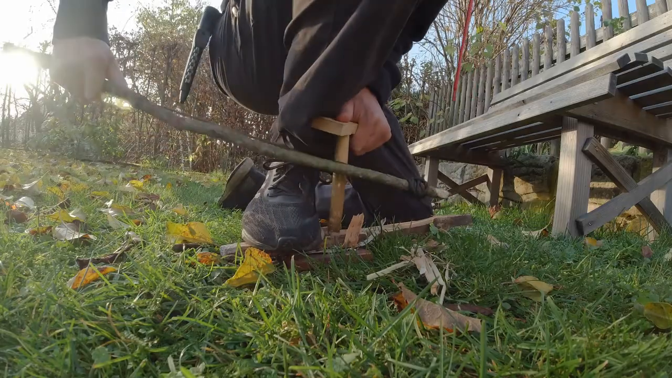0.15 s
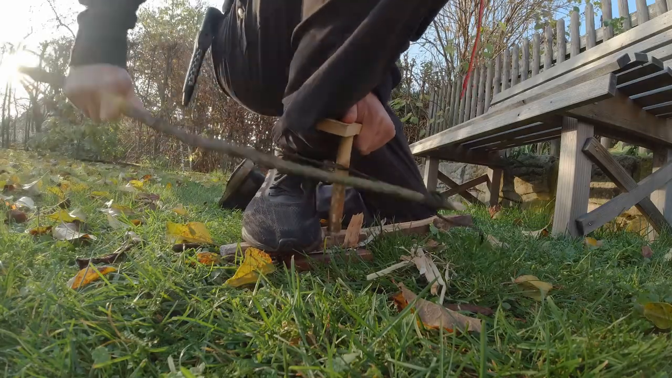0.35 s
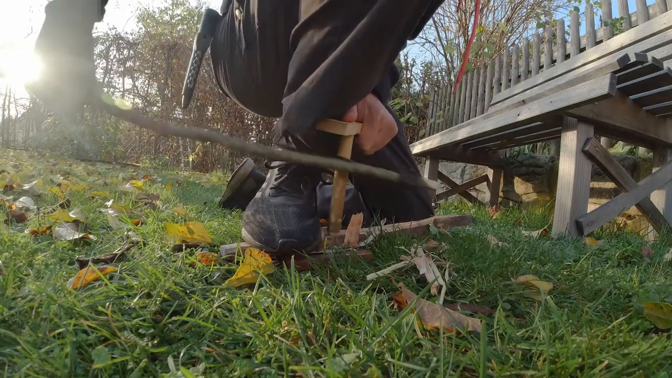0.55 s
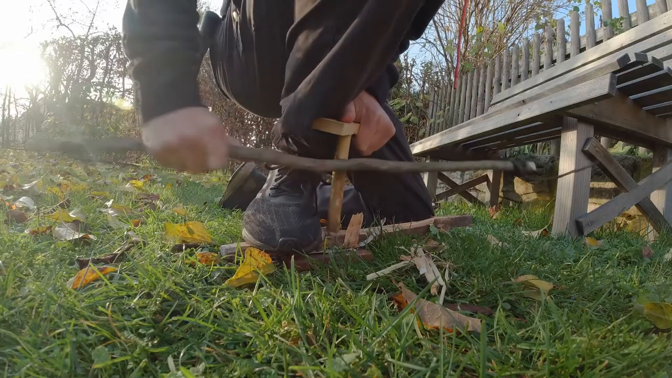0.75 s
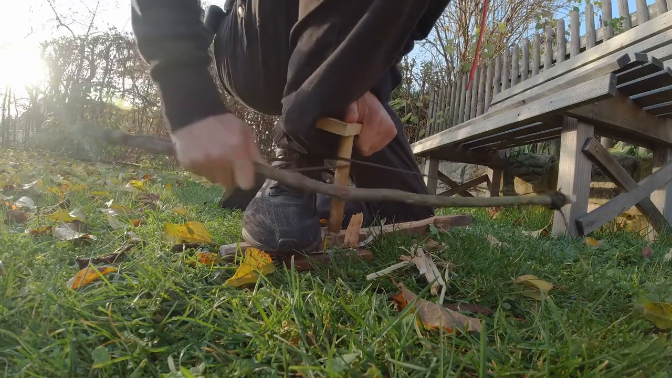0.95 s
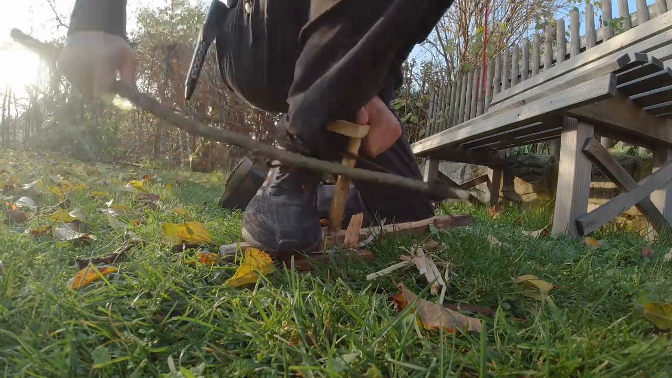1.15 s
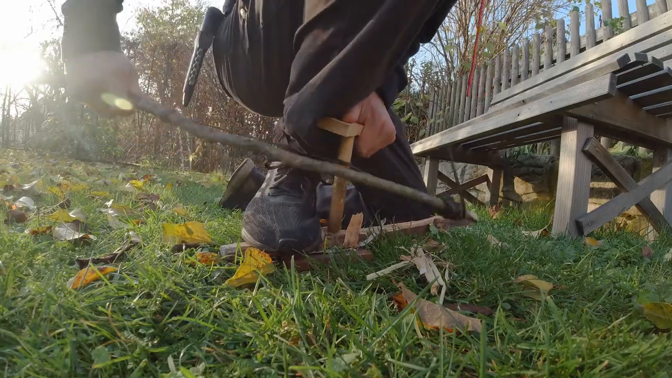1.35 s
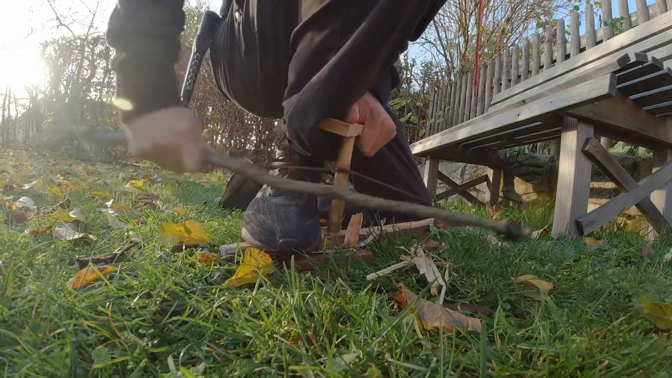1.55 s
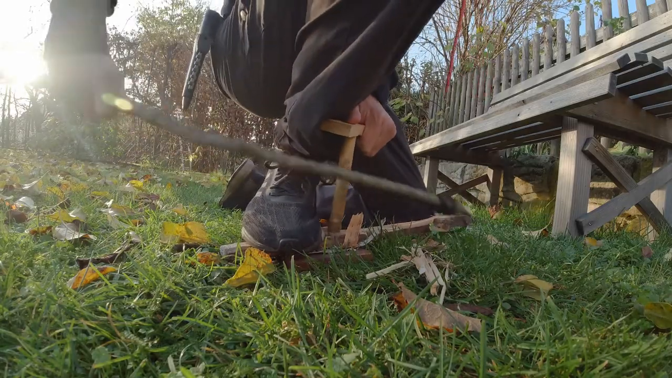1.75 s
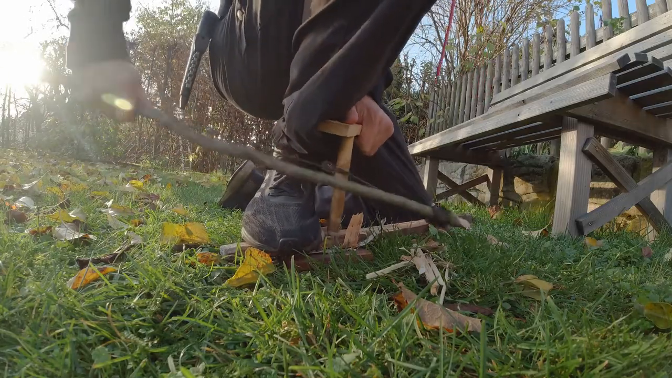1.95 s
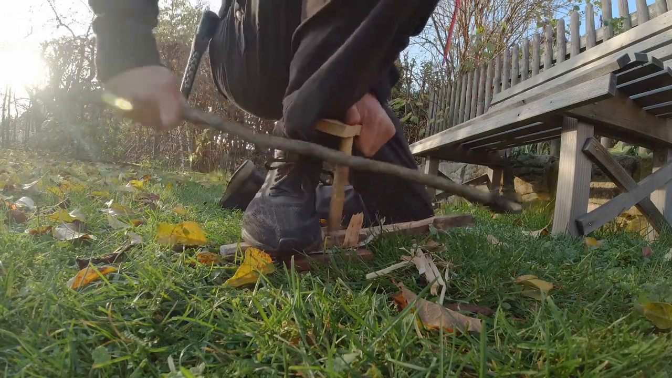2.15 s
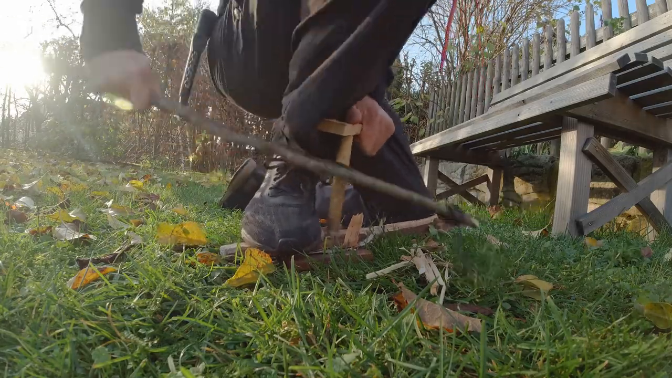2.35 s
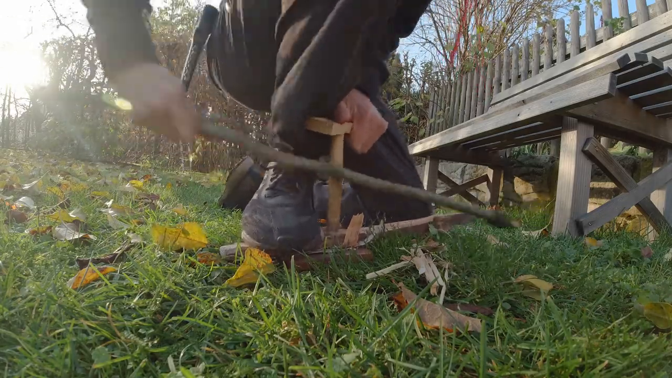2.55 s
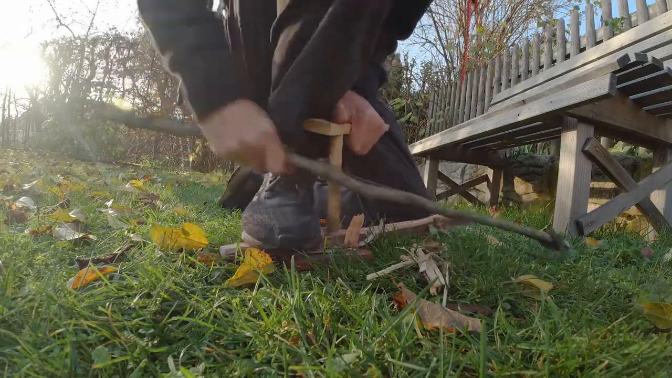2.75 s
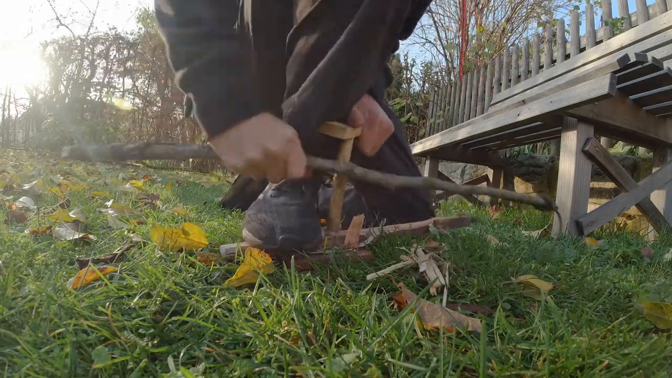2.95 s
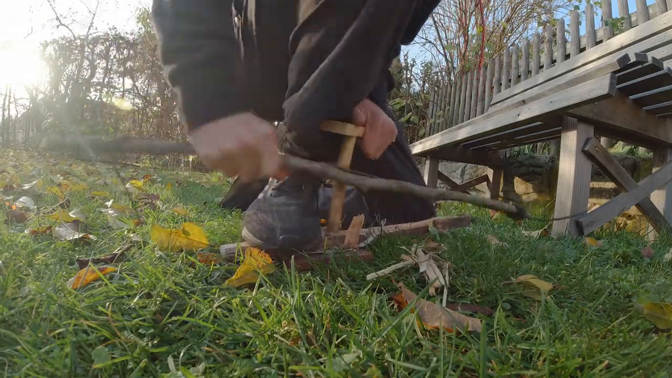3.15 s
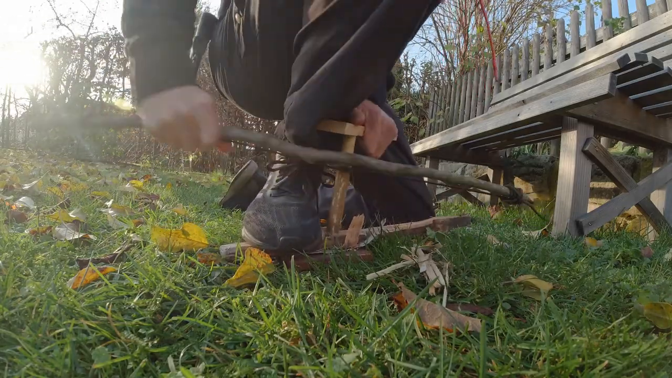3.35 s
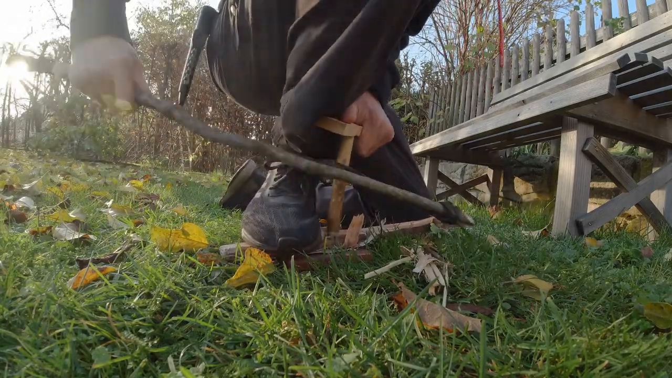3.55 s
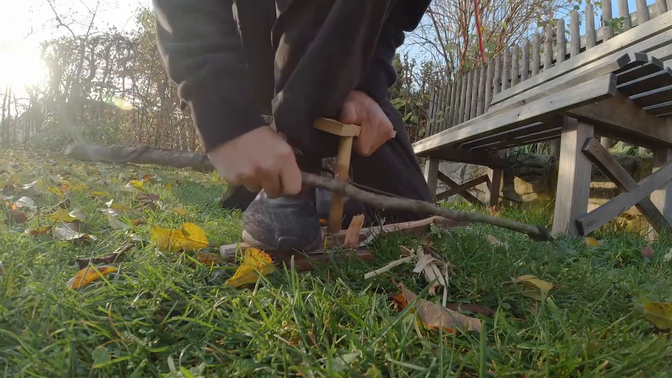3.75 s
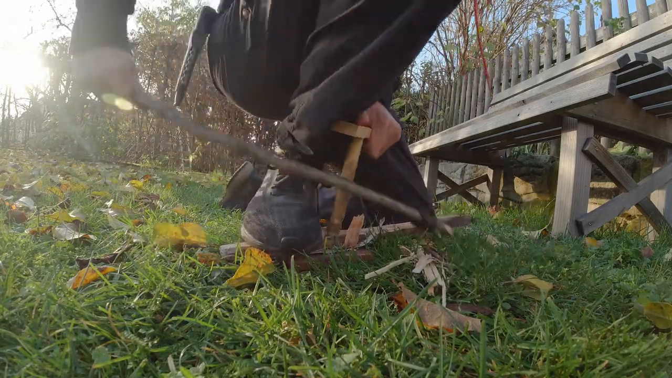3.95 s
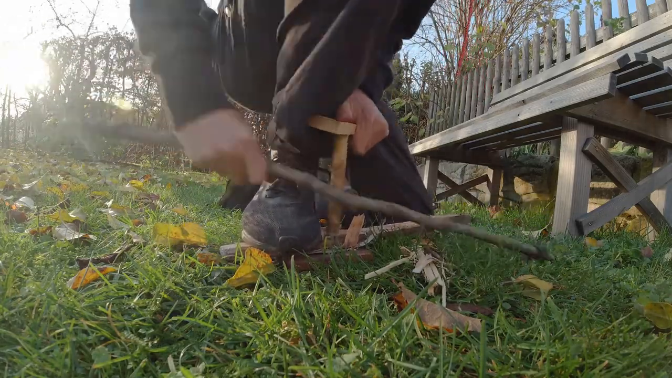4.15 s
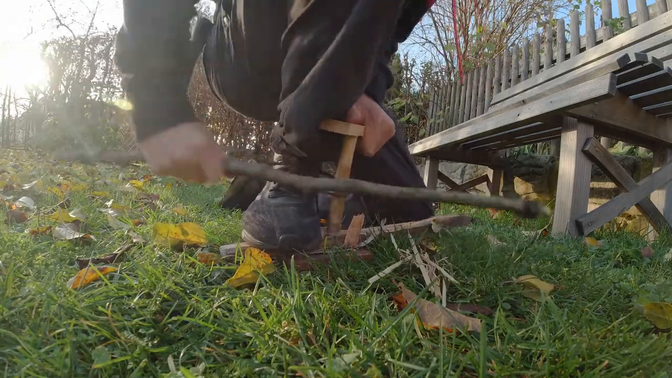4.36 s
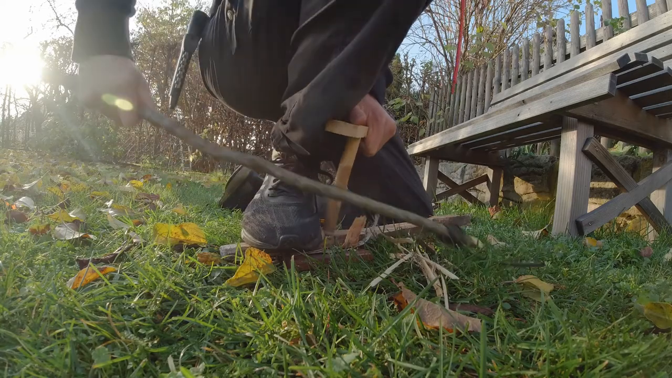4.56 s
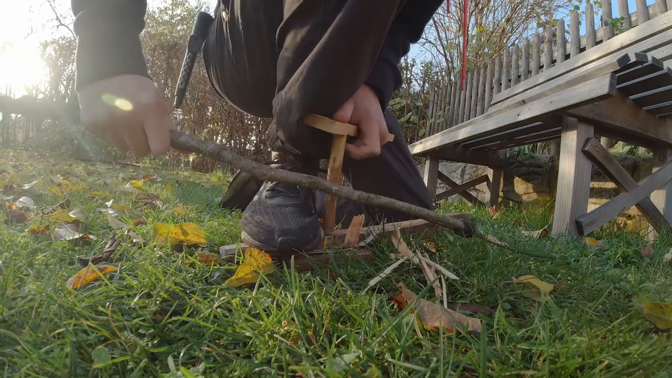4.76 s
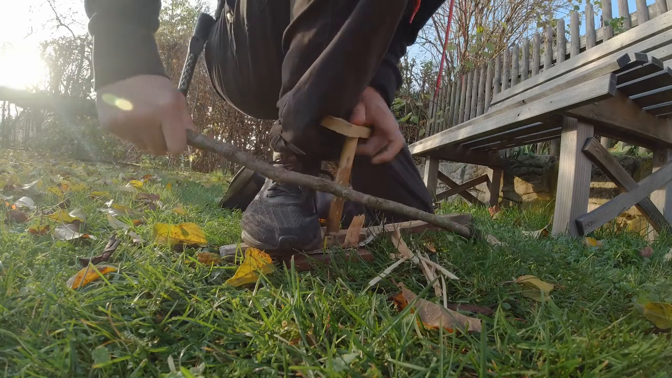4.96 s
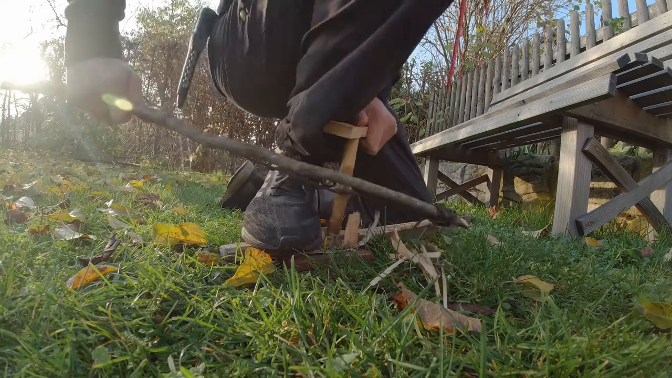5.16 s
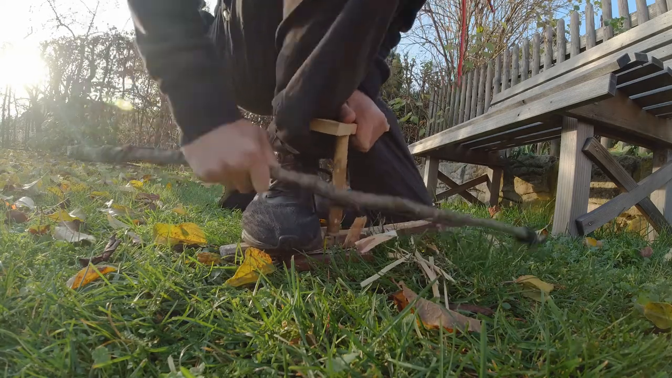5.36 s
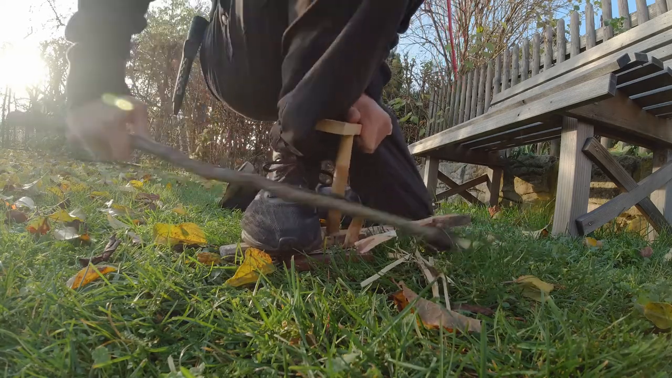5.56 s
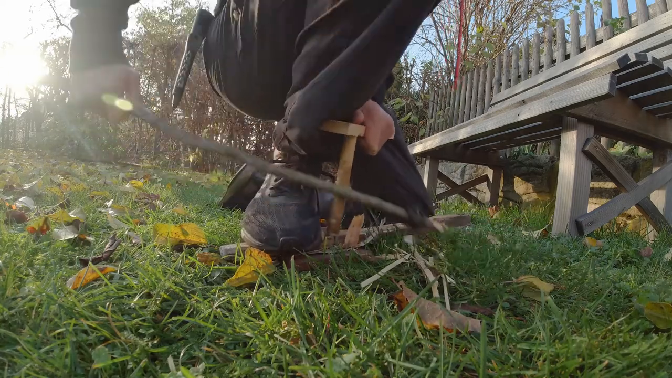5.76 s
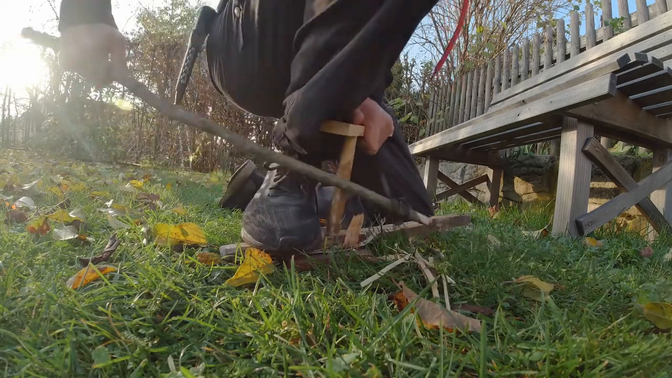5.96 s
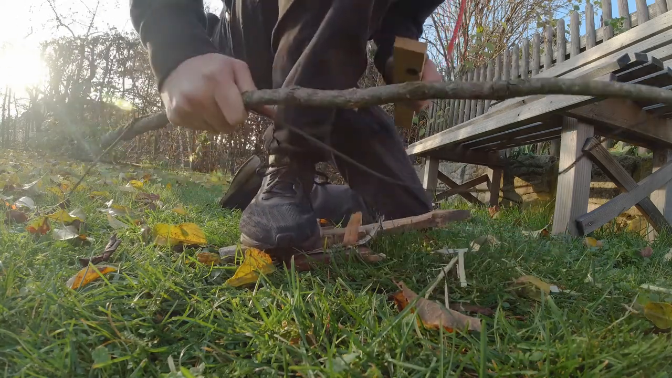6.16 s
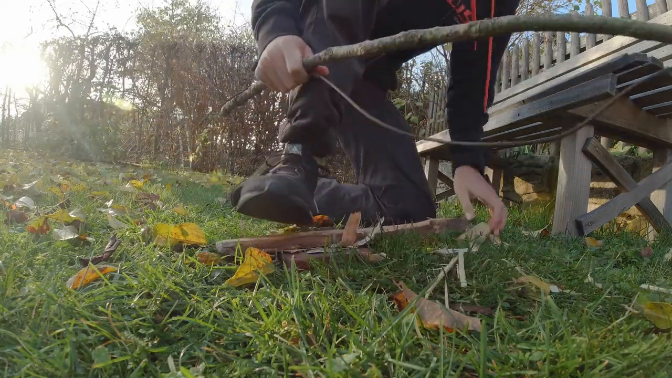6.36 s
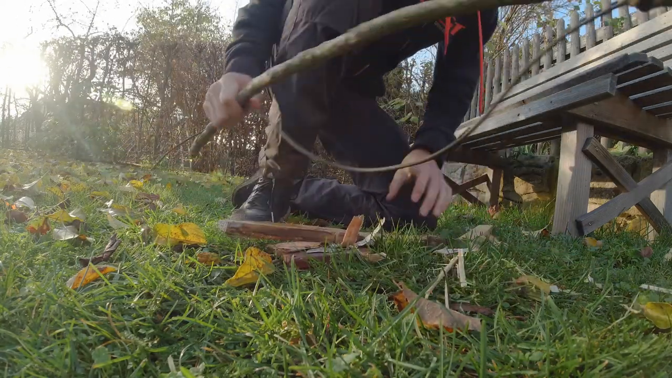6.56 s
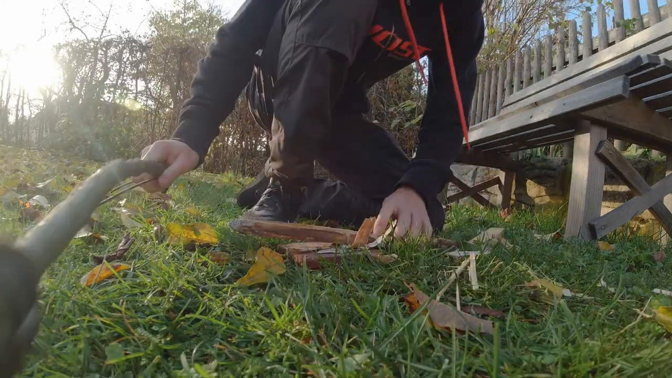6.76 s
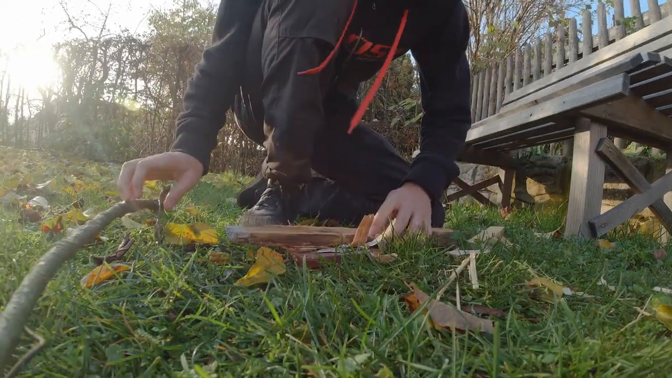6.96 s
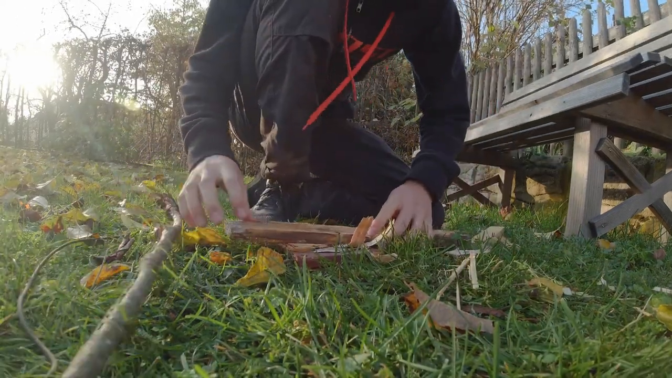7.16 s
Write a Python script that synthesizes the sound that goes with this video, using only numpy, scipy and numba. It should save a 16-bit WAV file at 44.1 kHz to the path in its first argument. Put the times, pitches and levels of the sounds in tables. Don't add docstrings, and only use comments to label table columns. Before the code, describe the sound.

Rapid dry wooden squeaks and grinding scrapes come in bursts, pause, resume, then stop as wood drops into grass with a sharp clack.

```python
import sys
import numpy as np
from scipy import signal
from scipy.fft import rfft, irfft
from scipy.io import wavfile
from scipy.ndimage import uniform_filter1d
from numba import njit

SR = 44100
rng = np.random.default_rng(int(sys.argv[2]) if len(sys.argv) > 2 else 0)


def volts(x):
    e = np.asarray(x, float) / 20
    return 10 ** e


def transcribe(signal):
    frames = np.atleast_2d(signal).T
    limited = np.clip(frames, -1, 1)
    pcm = np.round(limited * 32767).astype(np.int16)
    wavfile.write(sys.argv[1], SR, pcm)


N = 317961
DRILL_END_S = 6.14

# mid-stroke [t/s], length [ms], slip rate [f/Hz], squeak [level/dB], board ring [level/dB]
RUN_1 = [(.059, 23.7, 1614, -32.5, -32), (0.101, 15, 1696, -32, -35), (.122, 21.2, 1580, -25.5, -22),
         (.165, 33.4, 1868, -31, -42), (0.224, 24.4, 1528, -32.5, -25), (0.271, 21.3, 1780, -31, -32),
         (.334, 30.8, 1273, -37.5, -26), (0.379, 26.7, 1565, -32, -30.5), (0.436, 27.4, 1482, -30.5, -27),
         (0.539, 18.4, 1750, -38.5, -34), (.598, 18.6, 1588, -34, -35.5), (0.644, 31.6, 1410, -26, -26),
         (0.757, 16.3, 1487, -34.5, -33.5), (.869, 28.8, 1343, -23.5, -27.5), (0.991, 13, 1624, -32, -31),
         (1.11, 27.7, 1506, -25.5, -25.5), (1.218, 29, 1648, -48.5, -52)]
RUN_2 = [(1.437, 29.3, 1518, -28, -27.5), (1.551, 21.8, 1285, -29, -25), (1.65, 29.2, 1513, -25.5, -25),
         (1.746, 24.8, 1534, -24.5, -28), (1.847, 26.3, 1162, -32, -22.5), (1.943, 25, 1176, -28.5, -21),
         (2.05, 24.8, 1762, -30, -23.5), (2.147, 24, 1580, -39.5, -41.5), (2.206, 18.8, 1600, -33, -35.5),
         (2.255, 27.8, 1630, -25, -25.5), (2.303, 21, 1770, -38.5, -33), (2.342, 42.6, 1267, -30.5, -35.5)]
RUN_3 = [(2.437, 19.2, 1148, -30, -22.5), (2.523, 24.7, 1200, -32.5, -23),
         (2.607, 29.1, 1160, -34.5, -27.5), (2.704, 23.6, 1750, -39.5, -32.5), (2.79, 30, 1324, -31.5, -26),
         (2.88, 20.7, 1270, -33.5, -23), (2.942, 19.1, 1740, -35, -36.5), (2.98, 11, 1495, -33, -19.5),
         (3.076, 23.5, 1133, -31.5, -32), (3.127, 33, 1510, -43, -57), (3.16, 16, 1285, -39, -33),
         (3.267, 10.1, 1170, -26.5, -26), (3.36, 21.2, 1520, -31, -28.5)]
RUN_4 = [(3.62, 17.8, 1512, -33, -30), (3.704, 26, 1242, -32.5, -25.5), (3.789, 27.5, 1186, -37, -25),
         (3.868, 20, 1170, -37, -25.5), (3.951, 23.3, 1719, -33.5, -23), (4.031, 25, 1328, -31.5, -31),
         (4.12, 25, 1210, -37, -29), (4.2, 15.2, 1121, -34.5, -23.5), (4.281, 25, 1302, -41.5, -40.5),
         (4.327, 20, 1556, -42, -46.5), (4.371, 20.4, 1210, -27.5, -24.5), (4.455, 12.1, 1527, -25.5, -32),
         (4.496, 26, 1544, -49, -50.5), (4.537, 26.6, 1207, -33.5, -41), (4.581, 27.6, 1552, -48.5, -52.5)]
RUN_5 = [(5.142, 15, 1724, -29, -41), (5.265, 9.4, 1525, -30, -38), (5.31, 13, 1635, -34.5, -36),
         (5.39, 21.3, 1546, -37.5, -40.5), (5.436, 6.4, 1730, -36, -36.5), (5.479, 8.9, 1484, -32, -32.5),
         (5.561, 12.2, 1470, -32.5, -30.5), (5.605, 27, 1750, -38, -46.5), (5.652, 14.6, 1351, -29.5, -30),
         (5.744, 16.6, 1283, -29, -24), (5.84, 15, 1210, -43.5, -28), (5.93, 33, 1406, -39.5, -50),
         (6.03, 22, 1196, -31, -27), (6.077, 32, 1463, -45, -48)]
RUNS = (RUN_1, RUN_2, RUN_3, RUN_4, RUN_5)
# [f/Hz], width [Hz], [level/dB]
STEM_MODES = [(4270, 5200, -2), (9580, 2500, 0.5)]
# [t/s], peak [level/dB], t60 [s], brightness [level/dB]
CLACK_EVENTS = [
    (6.384, -40, 0.02, -13),
    (6.609, -49.5, 0.026, -15),
    (6.676, -41, .012, 16),
    (6.787, -29, 0.1, -6),
    (6.797, -25.5, 0.11, 19),
    (6.818, -41, 0.06, -14),
    (6.855, -45, .03, -18),
    (6.892, -52, .03, -12),
    (6.918, -43, 0.03, 0),
    (6.998, -51, .03, 10),
]
# [t/s], peak [level/dB], pitch [f/Hz], t60 [s]
BUMP_EVENTS = [(2.483, -43, 156, 0.077), (3.694, -41.5, 436, 0.016), (4.727, -54, 513, 0.012),
               (4.762, -54, 478, 0.012), (4.88, -59, 470, 0.036), (4.909, -56.5, 433, 0.022),
               (5.326, -41.5, 140, 0.083), (5.918, -44, 459, 0.0087), (6.143, -41.5, 146.4, 0.052),
               (0.574, -52, 196, 0.021), (.69, -65, 226, 0.02), (0.794, -66, 196, 0.023),
               (6.071, -49.5, 336, 0.086), (6.603, -48, 222, 0.065), (6.988, -48, 130, 0.019)]


def unit(x):
    return x / np.sqrt(np.mean(x ** 2) + 1e-30)


@njit
def svf(x, hz, width):
    y, b, l = np.empty(len(x)), 0., 0.
    g, k = np.tan(np.pi * hz / SR), width / hz
    for i in range(len(x)):
        v = (b + g * (x[i] - l)) / (1 + g * (g + k))
        b, l, y[i] = 2 * v - b, l + 2 * g * v, k * v
    return y


def steep(x, hz, width):
    return svf(svf(x, 1. * hz, 1. * width), 1. * hz, 1. * width)


def modes(x, table):
    return sum((-1) ** k * volts(db) * steep(x, hz, width) for k, (hz, width, db) in enumerate(table))


def walk(rate_hz, size=N):
    hold = max(int(SR / rate_hz), 1)
    steps = np.repeat(rng.standard_normal(size // hold + 1), hold)
    return 1.3 * uniform_filter1d(steps, hold)[:size]


def coloured(table):
    hz, db = np.transpose(table)
    log_hz = np.log(np.arange(N // 2 + 1) * SR / N + 1)
    gain = volts(np.interp(log_hz, np.log(hz + 1), db))
    return unit(irfft(rfft(rng.standard_normal(N)) * gain, N))


def patchy(table, lo_hz, count, patch_db, rate_hz):
    noise = coloured(table)
    centres_hz = lo_hz * 2 ** (np.arange(count) / 2)
    return unit(sum(svf(noise, hz, hz / 3.2) * volts(patch_db * walk(rate_hz)) for hz in centres_hz))


def add(out, s, x):
    i = int(s * SR) - len(x) // 2
    a, b = max(i, 0), min(i + len(x), N)
    out[a:b] += x[a - i:b - i]


def drill():
    out, size = np.zeros(N), 4400
    t_ms = (np.arange(size) - size // 2) / SR * 1000
    for stroke in strokes():
        for at_s, part in stroke_parts(t_ms, *stroke):
            add(out, at_s, part)
    return out


def stroke_parts(t_ms, s, ms, hz, squeak_db, ring_db, groan_db):
    # [f/Hz], width [Hz], [level/dB]
    board = [(2300, 470, -4), (2693, 310, 0), (3157, 342, 6.5), (3740, 1400, -10)]
    # [f/Hz], width [Hz], [level/dB]
    grit_modes = [(4990, 2370, 4), (6840, 2600, -5.5), (10020, 3940, 2.5), (13900, 5900, -10.5)]
    # [f/Hz], width [Hz], [level/dB]
    hearth = [(426, 430, -9), (741.5, 177, 3)]
    shallow_jams_s = [4.369, 4.494, 4.539, 4.58, 5.145]

    grit_db = -9.5 + 0.5149 * np.clip(ms - 22, -14, 9) + 0.2643 * max(ring_db + 31.5, -15)
    mode_hz = np.clip(2 * hz, 2250, 3350)
    groan_rough = 1.5061 - (squeak_db - groan_db) / 13
    feeble_rough = min(-(squeak_db + 38.5) / 12, .45)
    rough = np.clip(max(groan_rough, feeble_rough), 0, 1 if ring_db > -50 else .45)
    feeble_db = np.clip(-.4 * (ring_db + 48.0), 0, 5) - 12.0 * (ring_db < -68)
    at_s, low_db, lead_ms = bite(s)

    pulses, catch, phase = slips(hz, rough, t_ms)
    dust = rng.standard_normal((3, len(t_ms)))

    squeak = steep(pulses + (0.56 + 1.1 * rough) * dust[0], hz, 360 + 600 * rough)
    squeak = squeak - svf(squeak, 930., 330.)

    scrape = pulses + (0.47 + 2.9 * rough) * dust[1]
    octave_db = 2.5 + low_db * (mode_hz < 2850)
    ring = modes(scrape, board[2:]) + volts(low_db) * modes(scrape, board[:2])
    ring = ring + volts(octave_db) * steep(scrape, mode_hz, 380)

    grit = modes(0.61 * pulses + dust[2] * np.exp(-phase / 0.54), grit_modes)

    deep_db = -10.5 * (np.abs(np.subtract(shallow_jams_s, s)).min() < .012)
    groan = steep(catch + 1.2 * dust[0], hz / 2, 180) + volts(deep_db) * modes(dust[2], hearth)
    groan = groan + volts(deep_db + 0.83 * (groan_db + 31.0)) * steep(dust[1], 420, 280)
    groan = groan + volts(np.clip(-.8 * (ring_db + 61.0), -30, 6)) * steep(dust[1], 380, 370)

    flat = max(feeble_db, 0)
    swell = bell(t_ms, 0.48 * min(ms, 60), np.where(t_ms < 0, 2.8, 1.6) + 0.3 * flat)
    grit = grit * bell(t_ms, 0.36 * min(ms, 60), 1.65 + 0.26 * flat)

    # signal, level/dB, swell exponent, bite flicker/dB, lead/ms
    parts = ((squeak, squeak_db, 1.3, 3.5, lead_ms),
             (ring, ring_db, 1.05, 4.0, 0),
             (grit, ring_db + grit_db + feeble_db, 0, 4.0, 0),
             (groan, groan_db, .9, 4.0, 0))
    for part, db, focus, bite_db, early_ms in parts:
        flicker_db = bite_db * walk(200, size=len(t_ms)) + 1.8 * walk(900, size=len(t_ms))
        part = part * swell ** focus * volts(flicker_db)
        centre_ms = np.average(t_ms, weights=part ** 2)
        part = np.roll(part, -int(centre_ms * SR / 1000))
        core = part[np.abs(t_ms) < ms / 2]
        yield at_s - early_ms / 1000, part * volts(db) / np.sqrt(np.mean(core ** 2))


def bell(t_ms, half_ms, power):
    return np.exp(-np.abs(t_ms / half_ms) ** power) * np.hanning(len(t_ms)) ** .5


def bite(s):
    bite_table = [(0.0581, 6.5, -5.5), (0.121, -1.5, -1), (0.1661, -10, 1), (0.225, 1.5, 2),
                  (0.2718, -5, -3), (0.335, 2.5, 2.5), (0.3811, -2, 1.5), (0.433, 1.5, -3),
                  (0.5413, -2.5, -1), (0.5972, -18, 2.5), (0.6429, 10.5, 0.5), (0.7554, 3, -2.5),
                  (0.8688, 9, 1), (0.995, -11, 1.5), (1.1095, 5, -1.5), (1.4409, 2, 7.5), (1.5533, 7, -2.5),
                  (1.6515, 5.5, 1), (1.7427, 14.5, -1), (1.8476, -4, -3.5), (1.9443, -4, 0.5),
                  (2.0489, 1.5, -4.5), (2.205, -3, -3), (2.252, -5, -1), (2.343, 5, 0.5),
                  (2.4359, -0.5, -1.5), (2.5225, -2.5, 1), (2.6075, -1.5, 1), (2.7034, 7, 4),
                  (2.79, 7.5, 3), (2.8816, 2, 2.5), (2.9387, -18, -1.5), (2.9808, 1.5, 1.5),
                  (3.075, 0.5, -3), (3.1601, 5, -8), (3.271, -4, -1), (3.36, -5, -0.5), (3.6187, -6, -3.5),
                  (3.7047, 4, -1), (3.787, -1.5, -2), (3.866, -5, -3.5), (3.9501, 0, -3.5),
                  (4.033, 9.5, -1.5), (4.1172, -1, 0), (4.1994, -9.5, -0.5), (4.2797, -0.5, -0.5),
                  (4.3697, -1.5, -0.5), (4.458, -6, 2), (4.5382, 0, 1), (5.144, 3, -1), (5.2619, 12, -4.5),
                  (5.3115, 6, -0.5), (5.3935, 2, 2), (5.4751, 3, -2), (5.5616, -0.5, 1.5), (5.6533, -10, 3),
                  (5.7451, 3.5, -1), (5.8387, 7, -4), (5.932, -1, 0), (6.0301, -5.5, -2)]
    return next((row for row in bite_table if abs(row[0] - s) < .009), (s, 0, 0))


def slips(hz, rough, t_ms):
    size = len(t_ms)
    wander = walk(120, size=size)
    wander = wander - wander[np.abs(t_ms) < 10].mean()
    sag = 1 - (.05 + .04 * rng.standard_normal()) * np.tanh(t_ms / 12)
    phase = np.cumsum(hz * sag * (1 + (0.03 + .1 * rough) * wander)) / SR
    cycle = np.floor(phase)
    strength = volts((5.5 + 3.7 * rough) * rng.standard_normal(size))
    pulses = unit(np.diff(cycle, prepend=0) * strength)
    catch = pulses * (-1) ** cycle
    return pulses - pulses.mean(), catch, phase % 1


def strokes():
    # [t/s], groan [level/dB]
    jams = [(.334, -52), (.598, -48.5), (1.436, -40), (1.65, -49), (1.849, -42), (1.943, -37.5),
            (2.049, -30), (2.147, -37), (2.343, -38.5), (2.436, -38), (2.522, -45.5), (2.606, -39),
            (2.702, -39.5), (2.79, -35), (2.979, -43.5), (3.075, -36.5), (3.269, -43.5), (3.361, -46),
            (3.622, -48.5), (3.703, -38.5), (3.867, -44), (3.952, -39), (4.199, -46.5), (4.28, -51),
            (4.369, -33.5), (4.494, -41), (4.539, -40.5), (4.58, -42.5), (5.145, -45), (6.077, -42.5)]
    faint_groans_db = [-57, -60, -52, -54, -51.5]
    # [t/s], length [ms], slip rate [f/Hz], squeak [level/dB]
    creaks = [
        (1.373, 18.3, 1848, -57),
        (3.466, 19, 1063, -61),
        (3.518, 20, 2000, -65),
        (3.572, 16, 2000, -57.5),
        (4.652, 10.5, 2400, -56),
        (4.702, 22, 2980, -59),
        (4.836, 40.7, 1075, -60),
        (5.025, 70, 1435, -65),
        (5.1, 30, 1510, -57.5),
    ]
    # [t/s], squeak [level/dB], groan [level/dB]
    returns = [(0.489, -67, -58), (0.691, -55.5, -50.5), (0.815, -57.5, -60.5), (0.91, -79, -54.5),
               (1.034, -67.5, -54), (1.159, -61.5, -51.5), (1.496, -79.5, -67), (1.603, -64, -62.5),
               (1.698, -61, -64.5), (1.797, -64, -64.5), (1.897, -53, -66.5), (1.989, -52, -55),
               (2.103, -58, -45.5), (2.48, -63, -63), (2.566, -55.5, -67.5), (2.656, -71, -56.5),
               (2.748, -52.5, -48.5), (2.831, -56.5, -45), (3.035, -51, -57), (3.222, -65, -51),
               (3.318, -56, -53), (3.657, -58, -59), (3.745, -56, -55), (3.832, -43, -59.5),
               (3.913, -50, -51.5), (3.984, -51, -49), (4.068, -60, -57), (4.156, -50.5, -48.5),
               (4.235, -47, -48), (4.417, -52.5, -58.5), (5.212, -47.5, -53), (5.355, -47.5, -49.5),
               (5.515, -52.5, -52), (5.694, -55, -62), (5.789, -55, -54), (5.877, -58, -63),
               (5.982, -53, -50.5)]
    # [t/s], slip rate [f/Hz], squeak [level/dB]
    chirps = [
        (.049, 1600, -32.5),
        (1.422, 1530, -25),
        (1.637, 1640, -29),
        (1.832, 1350, -33.5),
        (1.91, 1200, -31.5),
        (3.8, 1200, -32.5),
        (2.778, 1330, -29),
        (.984, 1620, -39),
        (.764, 1560, -39.5),
    ]
    return_gap_s, return_fill, return_hz = .07, 0.27, 1653
    light_ring_db, light_groan_db, creak_ring_db = -3.5, 2.5, -14
    chirp_ms, chirp_ring_db = 9.0, -1.5

    jam_s, jam_db = np.transpose(jams)
    rows = [(s, ms, hz, db, db + creak_ring_db, db + light_groan_db) for s, ms, hz, db in creaks]
    for run, faint_db in zip(RUNS, faint_groans_db):
        for row in run:
            jammed = np.abs(jam_s - row[0]) < .012
            rows.append((*row, max([faint_db, *jam_db[jammed]])))
        s = np.array(run)[:, 0]
        for start, gap in zip(s, np.diff(s)):
            if gap > return_gap_s:
                middle = start + gap / 2
                at, light_db, groan_db = min(returns, key=lambda row: abs(row[0] - middle))
                hz = return_hz * (1 + 0.042 * rng.standard_normal())
                rows.append((at, 1000 * return_fill * gap, hz, light_db, light_db + light_ring_db, groan_db))
    return rows + [(s, chirp_ms, hz, db, db + chirp_ring_db, -70) for s, hz, db in chirps]


def rustle():
    # [f/Hz], [level/dB per Hz]
    cloth = [(200, -5.5), (300, -12), (700, -5), (1200, -11.5), (2000, -3.5), (3500, -11.5), (5300, -26),
             (7000, -42)]
    # [f/Hz], [level/dB per Hz]
    lawn = [(150, -0.5), (250, 0), (695, -10.5), (1270, -11.5), (1800, -6.5), (3030, -10.5), (6500, -34.5),
            (14300, -120)]
    # [f/Hz], width [Hz], [level/dB]
    drag_ring = [(974, 140, 8), (1780, 270, 8), (2210, 370, 0), (3960, 1240, 1.5)]
    # [f/Hz], width [Hz], [level/dB]
    cord_modes = [(4900, 2300, -3), (10100, 4100, 3.5), (14100, 5000, -1.5), (7750, 2200, -8)]

    body_db, hiss_db = handling_db()
    stops = turning()
    drilling = np.arange(N) < DRILL_END_S * SR
    grain = volts(np.where(drilling, 1, .6) * (1.6 * walk(30) + 3.6 * walk(300)))
    sleeve = patchy(cloth, 240, count=10, patch_db=1.5, rate_hz=32)
    drag = patchy(lawn, 222, count=10, patch_db=2.0, rate_hz=59)
    drag = drag + volts(-3.0) * unit(modes(rng.standard_normal(N), drag_ring))
    body = np.where(drilling, sleeve, drag)
    cord = unit(modes(rng.standard_normal(N), cord_modes)) * stops
    cord = cord * volts(2.5 + 1.2 * walk(170) + 2.4 * walk(24))
    stems = unit(modes(rng.standard_normal(N), STEM_MODES)) * grain
    hiss = np.where(drilling, cord, stems) * volts(hiss_db)
    return grain * body * stops ** 0.3 * volts(body_db + 1.0) + hiss


def handling_db():
    # start [t/s], end [t/s], sleeve [level/dB], cord hiss [level/dB], release [s]
    sawing = [
        (0.041, 1.227, -57.5, -68.5, 0.081),
        (1.369, 3.413, -57.5, -67.5, 0.08),
        (3.567, 4.621, -57, -68, 0.044),
        (4.6, 4.71, -65, -68.5, 0.0076),
        (5.097, 5.541, -51.5, -63, 0.035),
        (5.57, 6.127, -53.5, -63.5, 0.011),
    ]
    # start [t/s], length [s], [level/dB], hiss [level/dB], fade over shift [dB]
    fidgets = [
        (3.391, 0.029, -66, -83, -4),
        (3.504, 0.023, -54.5, -83, -4.5),
        (4.683, 0.019, -65, -86, -5.5),
        (4.73, 0.031, -69.5, -92.5, -6.5),
        (4.828, 0.052, -60, -90, -13.5),
        (5.005, 0.08, -61.5, -86, -2.5),
    ]
    # start [t/s], length [s], [level/dB], hiss [level/dB], fade over drag [dB]
    laying = [
        (6.171, 0.084, -53, -79, -11),
        (6.365, 0.15, -73, -86, -6),
        (6.588, 0.058, -67.5, -90, -11),
        (6.658, 0.14, -64, -84, 6.5),
        (6.778, 0.13, -52, -84, -14),
        (6.907, 0.167, -59, -68, -12.5),
        (7.08, 0.14, -76.5, -85.5, -4),
    ]
    saw_attack_s, arch_db = .04, -0.5
    drag_attack_s, drag_release_s = 0.016, 0.013

    drilling = np.arange(N) < DRILL_END_S * SR
    rest = np.where(drilling, [[-78], [-103]], [[-80.5], [-104]])
    out = rest * 1.
    for start, end, *db, release in sawing:
        on, share = gate(start, end, saw_attack_s, release)
        work_db = np.array(db)[:, None] - arch_db * (2 * share - 1) ** 2
        out = np.maximum(out, rest + on * (work_db - rest))
    for start, length, level_db, hiss_db, fade_db in [*fidgets, *laying]:
        on, share = gate(start, start + length, drag_attack_s, drag_release_s)
        drag_db = np.array([[level_db], [hiss_db]]) + fade_db * share
        out = np.maximum(out, rest + on * (drag_db - rest))
    return out


def gate(start, end, attack, release):
    t = np.arange(N) / SR
    on = np.interp(t, [start - attack, start, end, end + release], [0, 1, 1, 0])
    return on, np.clip((t - start) / (end - start), 0, 1)


def turning():
    idle_turns_s = [4.6, 4.64, 4.68, 5.115, 5.6, 5.901, 5.955, 6.099]
    dip_db, dip_s = -20, 0.0028
    s, ms, _, _, ring_db = np.concatenate(RUNS).T
    hard = ring_db > -45
    s, reach = s[hard], (0.83 * ms[hard] + 12) / 1000
    turns_s = np.concatenate([s - reach, s - reach - .005, s + 1.15 * reach, idle_turns_s])
    stops = np.zeros(N)
    stops[(turns_s * SR).astype(int)] = 1
    dips = signal.oaconvolve(stops, signal.windows.gaussian(1201, dip_s * SR), "same")
    return volts(dip_db * np.clip(dips, 0, 1))


def knocks():
    # [t/s], peak [level/dB], pitch [f/Hz], crackle [level/dB], spread [ms]
    contacts = [
        (6.186, -41.5, 2300, -47.5, 16),
        (6.377, -39.5, 2530, -57.5, 7),
        (6.425, -55, 1490, -93, 9.6),
        (6.584, -48.5, 3180, -76.5, 15),
        (6.675, -52, 1710, -38.5, 13),
        (6.797, -22.5, 2980, -44, 11.4),
        (6.818, -36, 1730, -74, 9.3),
        (6.918, -54, 1740, -45.5, 7.7),
        (6.994, -66, 1830, -52, 5),
        (6.677, -47, 12100, -90, 13),
    ]
    out, t_ms = np.zeros(N), np.arange(-2000, 2000) / SR * 1000
    for s, db, hz, crackle_db, ms in contacts:
        shape = np.exp(-np.maximum(t_ms, -8 * t_ms) / max(ms, 1))
        dust = rng.standard_normal((2, len(t_ms))) * volts(1.6 * walk(600, size=len(t_ms)))
        dull = steep(svf(dust[0], 1350.0, 2300.0), 1260, 1500)
        wood = unit(steep(dust[0], hz, 0.24 * hz) + volts(-11.5) * dull)
        crackle = unit(modes(dust[1], STEM_MODES))
        add(out, s, shape * (wood * volts(db - 7.5) + crackle * volts(crackle_db - 8.0)))
    return out


def clacks():
    # [f/Hz], width [Hz], [level/dB]
    bow = [(405, 270, 2.5), (760, 260, 2), (1017, 180, 10), (1810, 380, 6)]
    # [f/Hz], width [Hz], [level/dB]
    bow_top = [(2790, 280, -2), (3500, 1250, 4), (4390, 1300, -12.5)]
    out, t = np.zeros(N), np.arange(-6000, 6000) / SR

    def fall(t60):
        return (t >= 0) * np.exp(-np.log(1000) * np.abs(t) / max(t60, .003))

    for s, db, t60, bright_db in CLACK_EVENTS:
        blow = rng.standard_normal(len(t)) * (fall(0.0023) + 0.31 * fall(t60))
        clack = modes(blow, bow) + volts(bright_db) * modes(blow * fall(1.3 * t60), bow_top)
        add(out, s, clack * volts(db) / np.abs(clack).max())
    return out


def bumps():
    out, t = np.zeros(N), np.arange(-6000, 6000) / SR
    for s, db, hz, t60 in BUMP_EVENTS:
        fall = np.exp(-np.log(1000) * np.maximum(t - .02, 0) / max(t60, .01))
        shape = np.clip(t / 0.0047, 0, 1) * fall
        scuff = unit(steep(rng.standard_normal(len(t)), 1.55 * hz, 2.7 * hz))
        add(out, s, volts(db - 3.5) * shape * (np.sin(2 * np.pi * hz * t) + 0.31 * scuff))
    return out


def outdoors():
    # [t/s], [level/dB]
    wind = [(0, -67), (3, -61.5), (6.2, -62), (6.65, -63), (7.21, -68)]
    # [f/Hz], [level/dB per Hz]
    self_noise = [(3000, -7.5), (6000, 0), (12600, -2), (13400, -30)]
    # [f/Hz], [level/dB per Hz]
    far_air = [(59, -29), (100, 15.5), (808, 1), (1160, -31.5), (2550, -5), (8000, -32.5), (11700, -57),
               (19800, -120)]
    wind_db = np.interp(np.arange(N) / SR, *np.transpose(wind))
    rumble = unit(steep(rng.standard_normal(N), 23, 74)) * volts(wind_db + 1.3 * walk(4))
    hiss = coloured(self_noise) * volts(-92.5)
    air = patchy(far_air, 78, count=13, patch_db=1.5, rate_hz=44) * volts(-70.5)
    return rumble + hiss + air


def scene():
    mono = drill() + rustle() + knocks() + clacks() + bumps() + outdoors()
    return np.array([mono, mono])


def lock_phase(phase, s, lead_frames, bins=slice(None)):
    frame = int(s * SR / 64)
    phase[:, bins, frame - lead_frames:] -= phase[:, bins, frame:frame + 1].copy()


def top_cut(x):
    return signal.sosfilt(signal.butter(12, 16550, fs=SR, output="sos"), x)


def record(dry):
    agreed_squeaks_s = [4.37, 5.652, 5.745, 6.031]
    top_hz, real_time_s = 15900, 6.5
    spread_rad, spread_rad_per_khz = 0.28, 0.37

    frames = signal.stft(dry, nperseg=512, noverlap=448)[2]
    drift = np.cumsum(0.4273 * rng.standard_normal(frames.shape), axis=2)
    drift = uniform_filter1d(drift, size=4, axis=1)
    clack_s = np.array(CLACK_EVENTS)[:, 0]
    for s in clack_s[np.diff(clack_s, prepend=0) > .04]:
        lock_phase(drift, s, 12)
    offset = np.cumsum(0.33 * rng.standard_normal(frames.shape[:2]), axis=1)[..., None]
    phase = offset + drift
    agreed = [(row[0] + .01, 0, 7) for row in BUMP_EVENTS] + [(s, 11, 19) for s in agreed_squeaks_s]
    for s, low, top in sorted(agreed):
        lock_phase(phase, s, 16, slice(low, top))
    phase = uniform_filter1d(phase, size=12, axis=2)
    khz, real = np.arange(257)[:, None] * SR / 512000, int(real_time_s * SR / 64)
    spread = np.minimum(spread_rad + spread_rad_per_khz * khz, 2)
    phase[..., real:] = spread * np.sin(uniform_filter1d(phase[..., real:], size=24, axis=1))
    wet = signal.istft(frames * np.exp(1j * phase), nperseg=512, noverlap=448)[1][:, :N]
    wet = signal.sosfilt(signal.ellip(8, .2, 60, top_hz, fs=SR, output="sos"), wet)
    return top_cut(volts(1.5) * wet)


dry = scene()
out = record(dry)
transcribe(out)
```